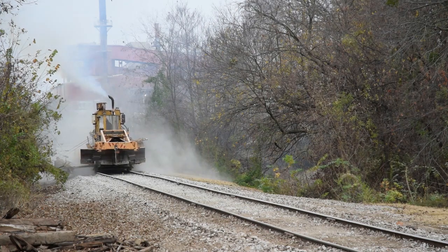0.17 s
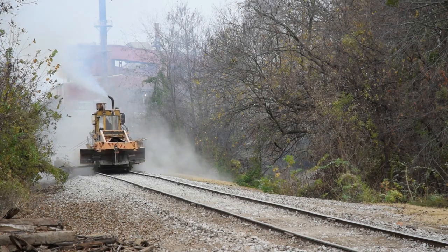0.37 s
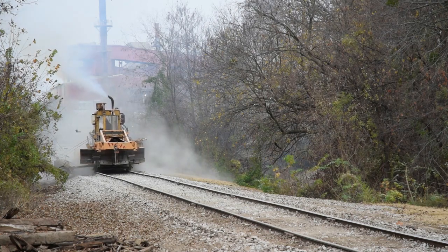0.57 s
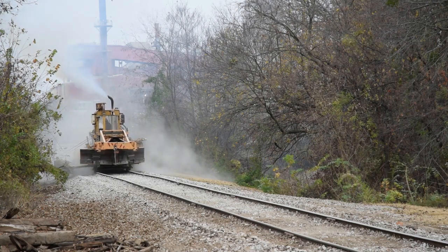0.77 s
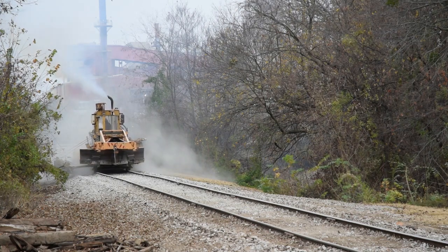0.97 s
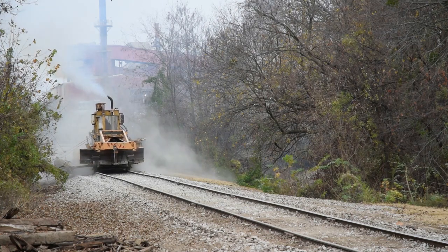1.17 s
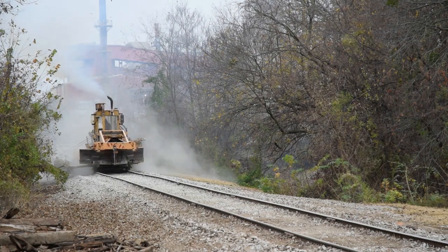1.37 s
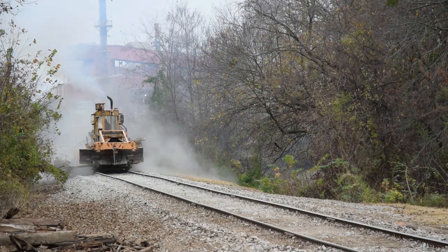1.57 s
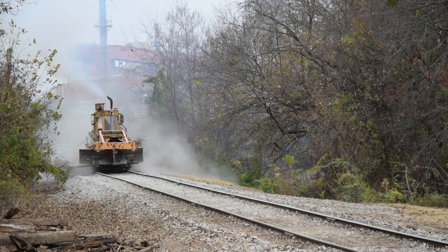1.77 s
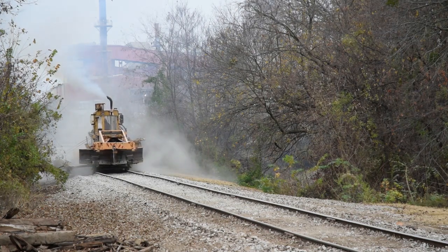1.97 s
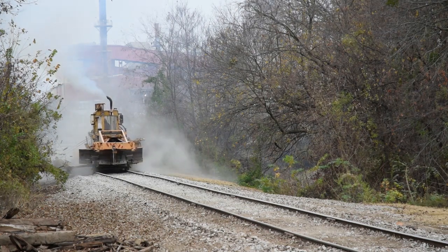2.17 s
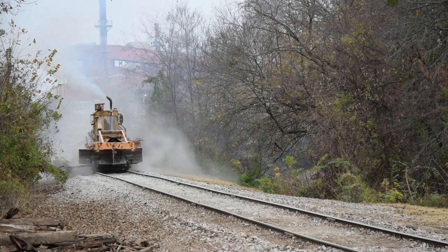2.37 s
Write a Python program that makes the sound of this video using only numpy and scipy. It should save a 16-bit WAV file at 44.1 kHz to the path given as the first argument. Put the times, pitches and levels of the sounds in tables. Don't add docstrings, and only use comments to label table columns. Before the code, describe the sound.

A diesel ballast-sweeping rail machine drones at near-constant speed for 2.5 seconds, low rumble under a knocking, slightly singing mid-range clatter. Gravel hiss surges around 0.3-0.7, 1.1, 1.4, 1.8 and 2.1 s, easing near 0.8-1.0 s. Stones ping on steel throughout; dull thuds land near 0.4, 0.7, 0.85, 1.25, 1.7 and 2.2 s, with air thumps strongest at 0.2 and 2.2 s. Diffuse tree reflections, faint breeze and hiss.

```python
import sys
import numpy as np
from scipy import signal
from scipy.fft import rfft, irfft
from scipy.io import wavfile
from scipy.ndimage import uniform_filter1d

SR = 44100
rng = np.random.default_rng(int(sys.argv[2]) if len(sys.argv) > 2 else 0)


def convert_level_to_amplitude(level_db):
    exponent = np.asarray(level_db, float) / 20
    return 10 ** exponent


def file_out(sig):
    cols = np.atleast_2d(sig).T
    lim = np.clip(cols, -1, 1)
    pcm = np.round(lim * 32767).astype(np.int16)
    wavfile.write(sys.argv[1], SR, pcm)


N = 110691
T = np.arange(N) / SR

# t/s, rate/(turns per s)
SHAFT_SPEED = [(0.0, 24.4), (0.07, 24.5), (0.26, 24.2), (0.46, 24.6), (0.68, 24.3), (0.81, 24.5),
               (1.08, 24.4), (1.22, 24.1), (1.37, 24.0), (1.6, 24.1), (1.79, 24.7), (1.91, 24.7),
               (2.1, 23.9), (2.45, 24.5), (2.51, 24.7)]
# shaft order, level/dB
EXHAUST_ORDERS = [(1, -35), (2, -25), (3, -10), (4, -15), (5, -21.5), (6, -1.5), (7, -8), (8, -13),
                  (9, -13), (10, -16.5), (11, -44), (12, 1), (13, -24), (14, -61), (15, -17), (16, -25)]
# f/Hz, width/Hz, level/dB, share of the load swing
BLOCK_RESONANCES = [(916, 34, -10.5, 0.43), (1005.6, 30.2, 1, .1), (1082, 29.4, -5, 0.58),
                    (1177.7, 33.3, -2, 0.89), (1245.7, 56, -3.5, 0.48), (1340, 58, -7, 0.34),
                    (1441, 52, -10.5, 0.46), (1625, 110, -12, 0.46)]
# t/s, level/dB
ENGINE_LOAD = [(0, -6.5), (.15, -2.5), (.36, 3), (.45, -3.5), (.8, -1.5), (.98, -9), (1.08, 2), (1.19, 3),
               (1.28, 1), (1.6, 2), (1.7, 3.5), (1.8, -2.5), (1.88, -8), (2.0, 0.5), (2.25, 1), (2.4, 5),
               (2.51, -0.5)]
# f/Hz, level/dB per Hz
RUMBLE_SPECTRUM = [(25, -35), (55, -2), (100, 0.5), (150, 0), (250, -2.5), (310, -2.5), (400, -10),
                   (520, -32)]
# f/Hz, level/dB per Hz
CLATTER_SPECTRUM = [(400, -7.5), (500, -4.5), (800, -2.5), (960, -3), (1120, -2.5), (1400, -1), (1840, -2),
                    (2200, -11.5)]
# f/Hz, level/dB per Hz
SPRAY_SPECTRUM = [(1900, -14.5), (2250, 1), (2420, -7), (2560, 2), (2900, -2), (10000, -4), (11200, -26.5),
                  (12300, -21.5)]
# t/s, level/dB
BROOM_SURGES = [(0.138, -29), (0.2074, -32), (0.2957, -26.5), (0.392, -25), (0.4948, -22.5), (0.601, -28),
                (0.7163, -23.5), (0.7991, -46), (0.9298, -47), (1.0246, -44), (1.132, -20), (1.2106, -42),
                (1.357, -23), (1.434, -19.5), (1.5184, -28), (1.6237, -34), (1.711, -27), (1.815, -21),
                (1.902, -26), (2.063, -18), (2.3017, -23.5), (2.4244, -34)]
# f/Hz, width/Hz, share
CHUTE_MODES = [(3360, 370, 0.39), (3796, 140, -0.48)]
# f/Hz, level/dB, t60/s
PLATE_MODES = [(1988, -41.5, .15), (2287, -40.5, 0.15), (2324, -40.5, 0.34), (2553, -41, 0.037),
               (2685, -60, 0.4), (2825, -48, 0.16), (3201, -47, 0.05), (4040, -37, 0.042),
               (4759, -40.5, 0.16), (4909, -64, 0.18), (6040, -40.5, 0.074), (6590, -39.5, 0.063),
               (8018, -43.5, 0.64), (8231, -51, .3)]
# t/s, level/dB, f/Hz, t60/s
STONE_PINGS = [(.143, -24, 2553, 0.22), (.23, -39, 2287, .4), (.27, -25, 3280, 0.13),
               (.42, -28, 2324, 0.35), (.72, -35, 2287, .4), (.78, -33, 2324, 0.22), (.86, -33, 2287, 0.34),
               (.96, -32, 2324, 0.35), (1.02, -31, 2680, .1), (1.18, -33, 2287, 0.23),
               (1.46, -30.5, 2324, .5), (1.55, -43, 2324, .4), (1.94, -28, 2680, .1),
               (2.32, -28, 2287, 0.37), (1.66, -28, 2610, 0.13), (.55, -25, 2580, 0.097),
               (1.13, -27, 2590, .12), (2.46, -25, 2553, .15), (.502, -24.5, 2324, 0.4),
               (.49, -23.5, 4759, 1), (.524, -29, 2287, 0.37), (0.553, -21, 3450, 0.047),
               (0.937, -21, 2287, 0.48), (1.13, -27.5, 2287, 0.58), (1.131, -26, 3370, 0.067),
               (1.135, -40, 4909, .3), (1.24, -32, 2287, 0.38), (1.333, -28, 2287, .4),
               (1.42, -26, 2553, 0.38), (1.443, -27, 3560, 0.1), (1.633, -28, 4759, 0.37),
               (1.724, -28, 4759, 0.44), (1.76, -33, 8018, .5), (1.793, -25, 2610, 0.17),
               (1.821, -19.5, 6230, 0.05), (2.058, -28, 2553, 0.26), (2.343, -25, 4759, 0.18)]
# t/s, level/dB, f/Hz
STONE_THUDS = [(.205, -19, 170), (0.379, -11, 123), (.64, -18, 247), (0.717, -14, 147), (.85, -14, 164),
               (1.011, -18.5, 117), (1.245, -12, 159), (1.669, -16, 179), (1.809, -17, 195),
               (2.2, -17.5, 141), (.2, -26, 245), (0.219, -16.5, 109), (0.681, -23, 124),
               (0.931, -21, 80.4), (1.291, -32, 109), (1.821, -20.5, 250), (2.071, -27, 95),
               (2.23, -28, 200)]
# t/s, level/dB
AIR_BLOWS = [
    (.205, -11),
    (.66, -19),
    (0.849, -14),
    (1.02, -32),
    (1.245, -25),
    (1.81, -29),
    (2.2, -10),
]
# f/Hz, level/dB per Hz
TREES_SPECTRUM = [(700, -9), (1900, -1.5), (3800, -7), (4400, 5), (6200, -16.5), (8500, -47), (9600, -36),
                  (10300, -46)]
# f/Hz, level/dB per Hz
BREEZE_SPECTRUM = [(20, -8), (45, -6), (80, 2), (150, -10), (300, -17)]
# f/Hz, level/dB
PORT_FLAT = [(2000, 0)]
# f/Hz, level/dB
LEFT_PORT = [(3000, 1), (4400, -5), (5300, 3), (6200, 2), (7500, -14.5), (8100, -7), (9300, -19.5),
             (9900, -10)]
# f/Hz, level/dB
RIGHT_PORT = [(3400, 5), (3800, 3), (4700, 5.5), (6150, -11), (6750, -11), (7200, -8), (8000, -2.5),
              (9300, -17.5)]
# f/Hz, phase/rad
LEFT_PORT_LEAD = [(500, 0),
                  (1900, 0.29), (3000, 0.6), (4200, 1.52), (4900, 3.5), (6000, 3), (6400, -0.3), (7300, 2.05),
             (8000, 3)]
# f/Hz, level/dB per Hz
HISS_SPECTRUM = [(8600, -1), (9600, 4), (10400, -11), (11000, -5.5), (13000, -2.5), (14400, -3.5),
                 (15100, 5), (15600, -8)]

EXHAUST_DB, EXHAUST_WAVER_DB, PHASE_SPREAD = -23.5, 1.0, 0.68
KNOCK_ORDERS = range(36, 69)
BLOCK_DB, KNOCK_WAVER_DB, BLOCK_GATE = -30.5, 1.8, 0.5
PANEL_HZ, PANEL_WOBBLE_RAD, PANEL_DB = 1174, 0.8, -42
RUMBLE_DB, CLATTER_DB, CLATTER_GATE = -27, -29.5, 0.053
SPRAY_DB, SPRAY_PATCH_DB = -21, 0.8
STONES_PER_S, STONE_SPREAD_DB = 4700, 3
SURGE_RISE_S, SURGE_FALL_S, SURGE_REF_DB = 0.02, 0.04, -15.5
SURGE_TILT = 0.85
THUD_FALL_S, THUD_WIDTH_HZ, BLOW_HALF_WIDTH_S = 0.012, 150, 0.0014
TREES_DB, BREEZE_DB = -34, -48
HISS_DB, HISS_WAVER_DB, HISS_SHARED = -54.5, 2.1, 0.9


def evened(x):
    return x / np.sqrt(np.mean(x ** 2) + 1e-20)


def read(points, hz):
    f, value = np.transpose(points)
    return np.interp(np.log(hz + 1), np.log(f + 1), value)


def colour(x, points, skirt_db=24):
    hz = np.fft.rfftfreq(x.shape[-1], 1 / SR) + 1
    below = np.maximum(np.log2(points[0][0] / hz), 0)
    above = np.maximum(np.log2(hz / points[-1][0]), 0)
    gain = convert_level_to_amplitude(read(points, hz) - skirt_db * (below + above))
    return evened(irfft(rfft(x) * gain, x.shape[-1]))


def drift(top_hz, low_hz=0.767):
    t = T[::64]
    wander = 0
    for f in np.geomspace(low_hz, top_hz, num=14):
        wander = wander + np.sin(2 * np.pi * (f * t + rng.random())) / np.sqrt(f)
    return np.interp(T, t, evened(wander))


def resonate(x, hz, width):
    turn = np.exp(2j * np.pi * hz * T[:len(x)])
    r = np.exp(-np.pi * width / SR)
    return 2 * (turn * signal.lfilter([1 - r], [1, -r], x / turn)).real


def swell(s, rise_s, fall_s):
    return np.exp(-np.where(T < s, ((T - s) / rise_s) ** 2, (T - s) / fall_s))


def patchy(depth_db, wide, long):
    frames = N // 128 + 5
    a, b, patch = rng.standard_normal((frames, 257, 3)).T
    patch = uniform_filter1d(patch, wide, 0)
    patch = evened(uniform_filter1d(patch, long, 1))
    bins = (a + 1j * b) * convert_level_to_amplitude(depth_db * patch)
    return signal.istft(bins, nperseg=512, noverlap=384)[1][:N]


def exhaust(turns):
    out = 0
    for order, db in EXHAUST_ORDERS:
        level = convert_level_to_amplitude(db + EXHAUST_WAVER_DB * drift(30.0, low_hz=4.0))
        out = out + level * np.cos(2 * np.pi * (order * turns + PHASE_SPREAD * rng.random()))
    return convert_level_to_amplitude(EXHAUST_DB) * out


def knocking_block(turns, load_db, firing):
    knock = 0
    for order in KNOCK_ORDERS:
        level = convert_level_to_amplitude(KNOCK_WAVER_DB * drift(15.0))
        knock = knock + level * np.cos(2 * np.pi * (order * turns + rng.random()))
    block = 0
    for hz, width, db, share in BLOCK_RESONANCES:
        rung = resonate(resonate(knock, hz, width), hz, width)
        block = block + convert_level_to_amplitude(db + share * load_db) * rung
    return (1 + BLOCK_GATE * firing) * convert_level_to_amplitude(BLOCK_DB) * evened(block)


def bonnet_panel(load_db):
    wobble = PANEL_WOBBLE_RAD * drift(14.0, low_hz=2.924)
    return convert_level_to_amplitude(PANEL_DB + 1.9 * load_db) * np.cos(2 * np.pi * PANEL_HZ * T + wobble)


def engine():
    turns = np.cumsum(np.interp(T, *np.transpose(SHAFT_SPEED))) / SR
    load_db = np.interp(T, *np.transpose(ENGINE_LOAD))
    firing = np.cos(2 * np.pi * 3 * turns)
    tones = exhaust(turns) + knocking_block(turns, load_db, firing) + bonnet_panel(load_db)
    rumble = colour(patchy(0.19, wide=3, long=30), RUMBLE_SPECTRUM)
    throbbing = (1 + CLATTER_GATE * firing) * patchy(0.32, wide=6, long=12)
    clatter = convert_level_to_amplitude(CLATTER_DB + 0.16 * load_db) * colour(throbbing, CLATTER_SPECTRUM)
    return np.sqrt(2) * tones + convert_level_to_amplitude(RUMBLE_DB) * rumble + clatter


def gravel_spray():
    surge = 0
    for s, db in BROOM_SURGES + [(1.7, -24), (1.1, -37)]:
        rise = swell(s + SURGE_RISE_S / 2, SURGE_RISE_S, SURGE_FALL_S)
        surge = surge + convert_level_to_amplitude(db - SURGE_REF_DB) * rise
    size = convert_level_to_amplitude(STONE_SPREAD_DB * np.minimum(rng.exponential(1, N), 5))
    stones = size * (rng.random(N) < STONES_PER_S / SR) * rng.choice([-1, 1], N)
    wash = evened(patchy(SPRAY_PATCH_DB, wide=8, long=20))
    spray = colour(wash + 0.77 * evened(stones), SPRAY_SPECTRUM)
    spray = spray + sum(share * resonate(spray, hz, width) for hz, width, share in CHUTE_MODES)
    dull = signal.sosfilt(signal.butter(2, 4200, fs=SR, output="sos"), spray)
    bright = spray - dull
    low = dull * (0.75 + (1 - SURGE_TILT) * surge)
    high = bright * (0.66 + SURGE_TILT * surge)
    return convert_level_to_amplitude(SPRAY_DB) * (low + high)


def ringing_plates():
    out = 0
    for hz, db, t60 in PLATE_MODES:
        knocks = rng.standard_normal(N) * (rng.random(N) < 600 / SR)
        out = out + convert_level_to_amplitude(db) * evened(resonate(knocks, hz, 3.1 / t60))
    for s, db, hz, t60 in STONE_PINGS:
        fall_s = t60 / np.log(1000)
        out = out + convert_level_to_amplitude(db) * swell(s, 0.0057, fall_s) * np.sin(2 * np.pi * hz * T)
    return out


def housing_thuds():
    out = 0
    for s, db, hz in STONE_THUDS:
        rough = evened(resonate(rng.standard_normal(N), hz, THUD_WIDTH_HZ))
        tone = np.sin(2 * np.pi * hz * (T - s))
        puff = swell(s, THUD_FALL_S / 2, THUD_FALL_S) * (tone + 0.5 * rough)
        out = out + convert_level_to_amplitude(db) * resonate(puff, hz, 2 * THUD_WIDTH_HZ)
    for s, db in AIR_BLOWS:
        u = (T - s) / BLOW_HALF_WIDTH_S
        out = out + convert_level_to_amplitude(db) * (1 - u ** 2) * np.exp(-u ** 2 / 2)
    return out


def camera_ports(machine):
    hz = np.fft.rfftfreq(N, 1 / SR)
    half_lead = np.exp(0.5j * read(LEFT_PORT_LEAD, hz))
    left = convert_level_to_amplitude(read(PORT_FLAT + LEFT_PORT, hz)) * half_lead
    right = convert_level_to_amplitude(read(PORT_FLAT + RIGHT_PORT, hz)) / half_lead
    return irfft(rfft(machine) * np.array([left, right]), N)


def trees():
    left, right = patchy(2.0, wide=12, long=20), patchy(0.65, wide=12, long=20)
    return convert_level_to_amplitude(TREES_DB) * colour(np.array([left, right]), TREES_SPECTRUM)


def breeze():
    return convert_level_to_amplitude(BREEZE_DB) * colour(rng.standard_normal((N, 2)).T, BREEZE_SPECTRUM)


def scene():
    machine = engine() + gravel_spray() + ringing_plates() + housing_thuds()
    return camera_ports(machine) + trees() + breeze()


def recorder_hiss():
    shared, left, right = rng.standard_normal((N, 3)).T
    own = np.array([left, right])
    hiss = np.sqrt(HISS_SHARED) * shared + np.sqrt(1 - HISS_SHARED) * own
    level = convert_level_to_amplitude(HISS_DB + HISS_WAVER_DB * drift(23.0, low_hz=5.6))
    return level * colour(hiss, HISS_SPECTRUM, skirt_db=63)


def top_cut(x):
    return signal.sosfilt(signal.butter(12, 16030, fs=SR, output="sos"), x)


def record(dry):
    return top_cut(dry + recorder_hiss())


dry = scene()
out = record(dry)
file_out(out)
```